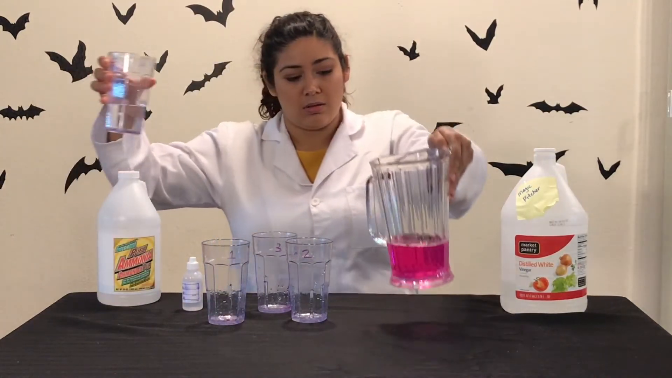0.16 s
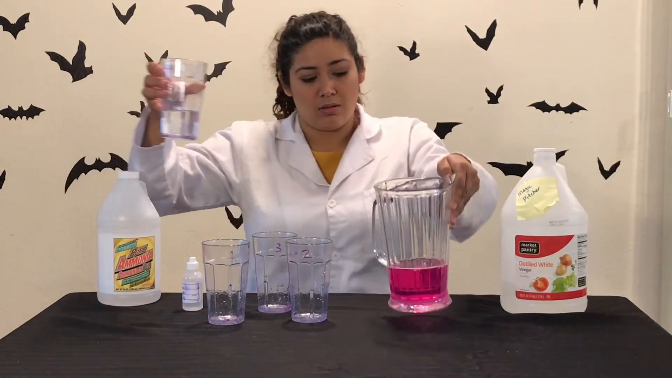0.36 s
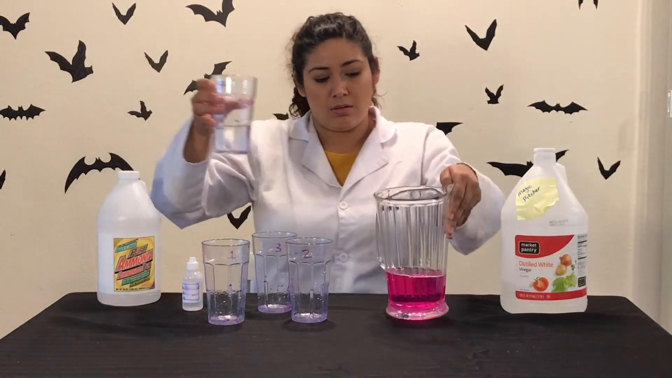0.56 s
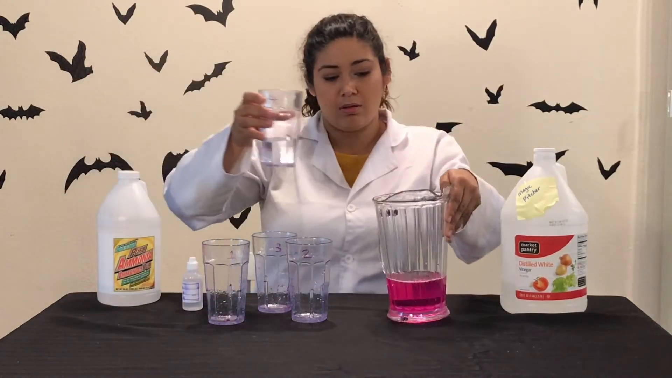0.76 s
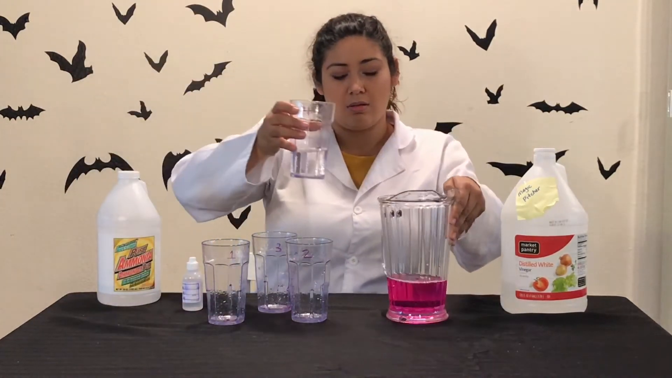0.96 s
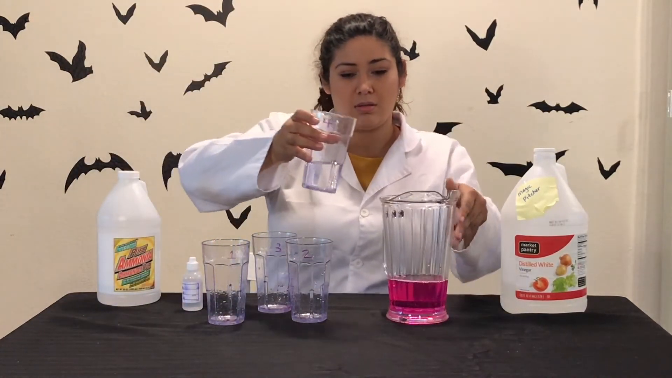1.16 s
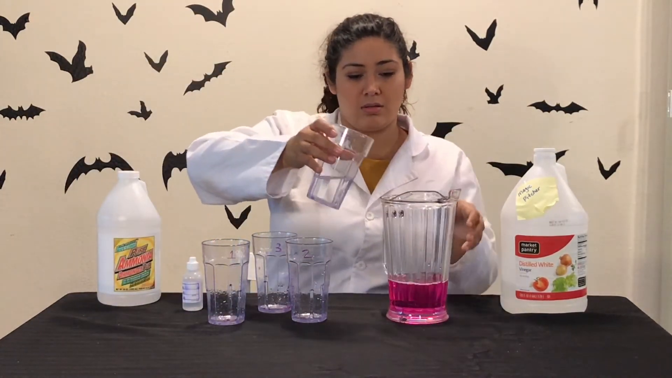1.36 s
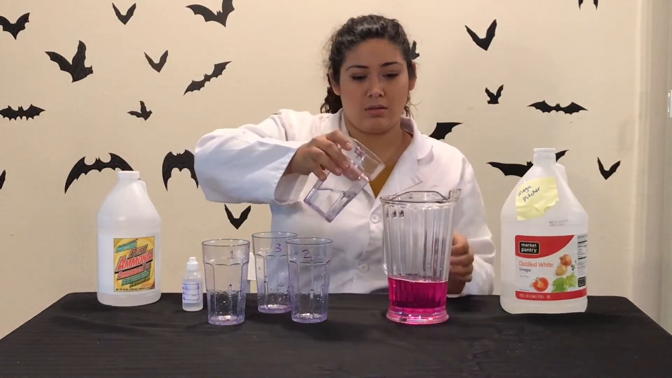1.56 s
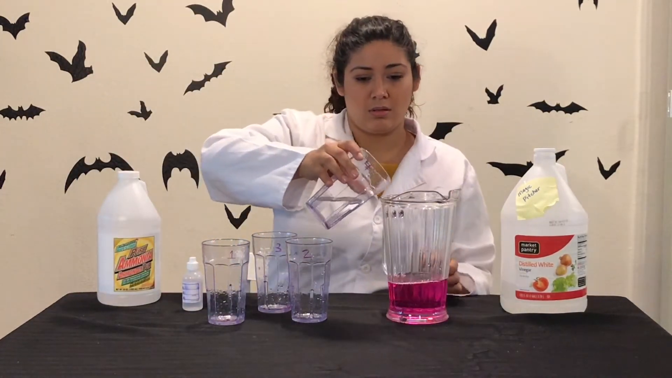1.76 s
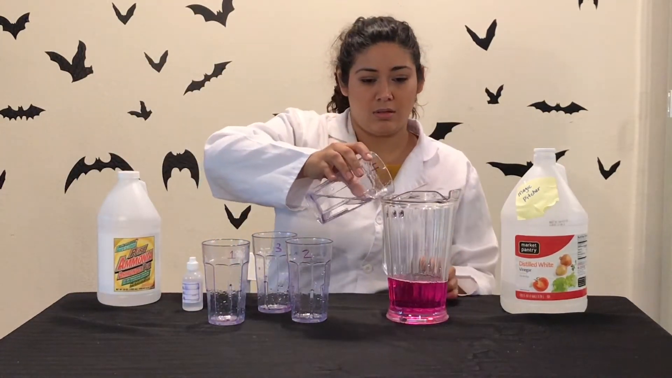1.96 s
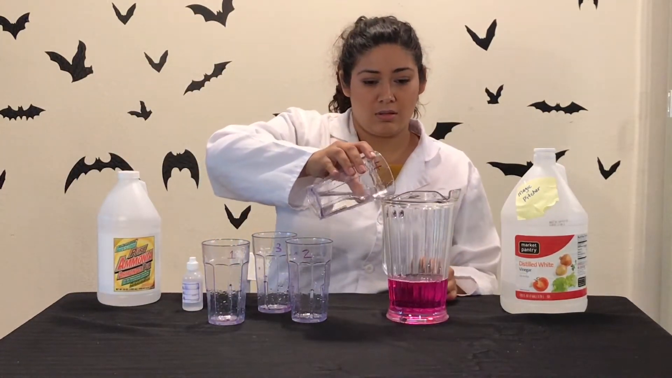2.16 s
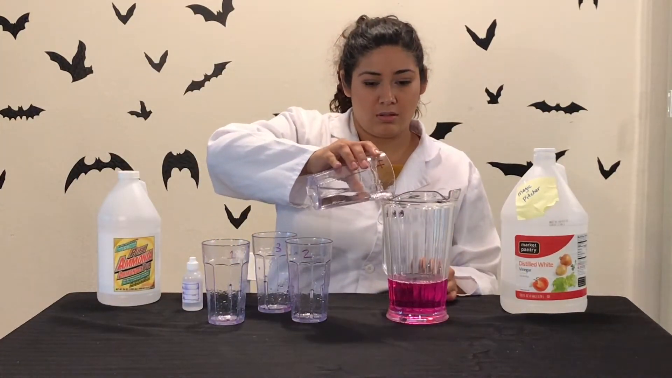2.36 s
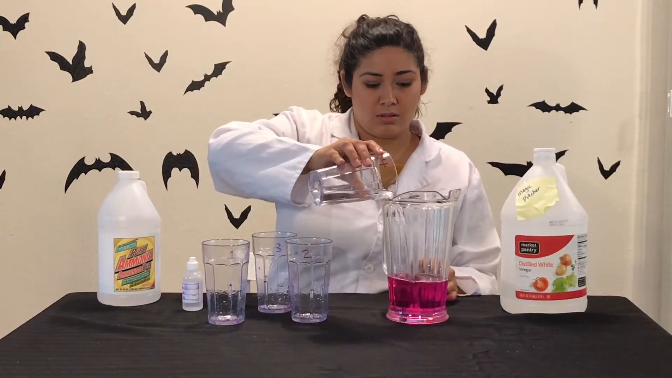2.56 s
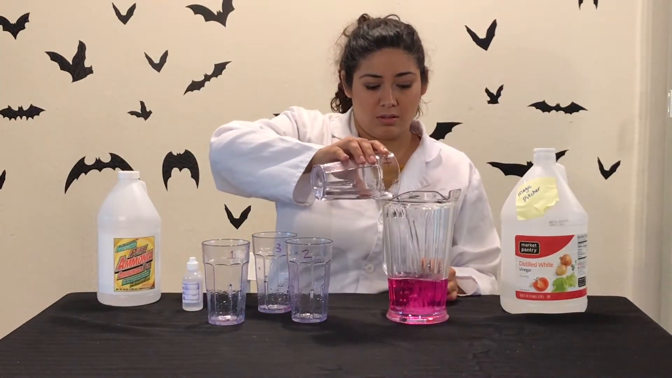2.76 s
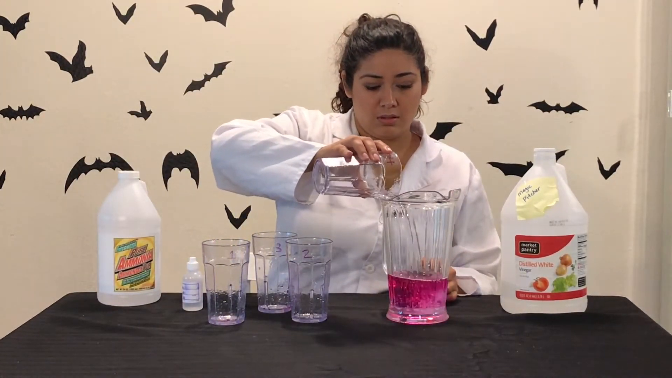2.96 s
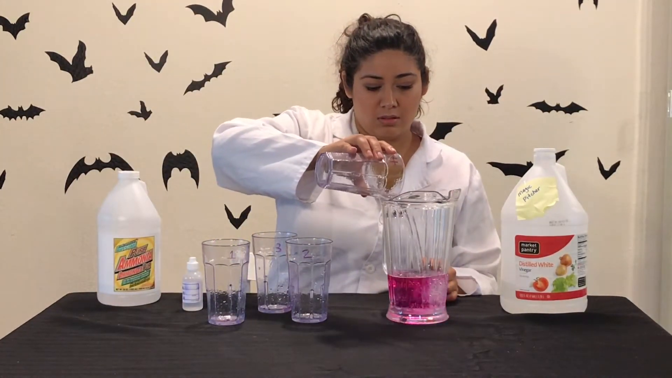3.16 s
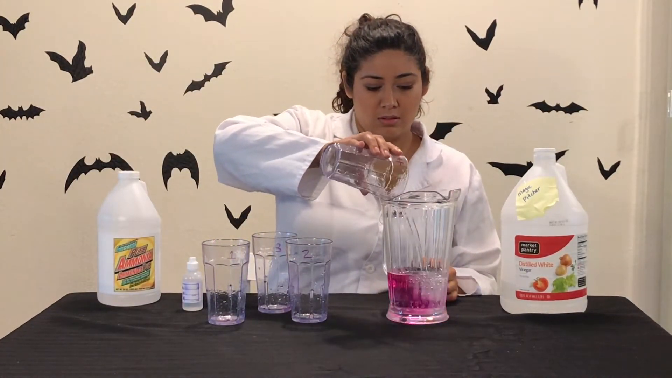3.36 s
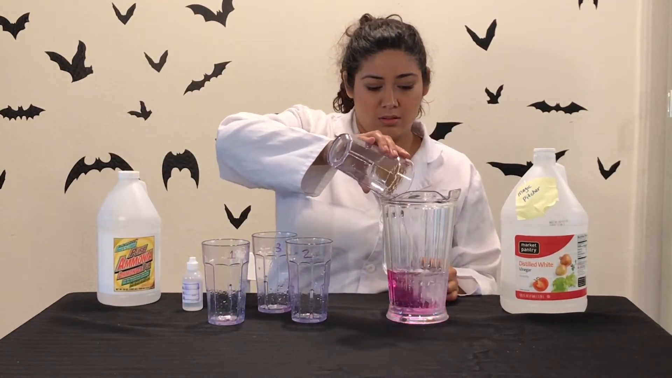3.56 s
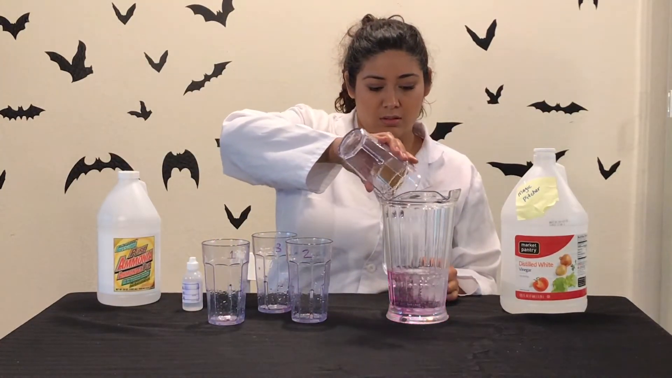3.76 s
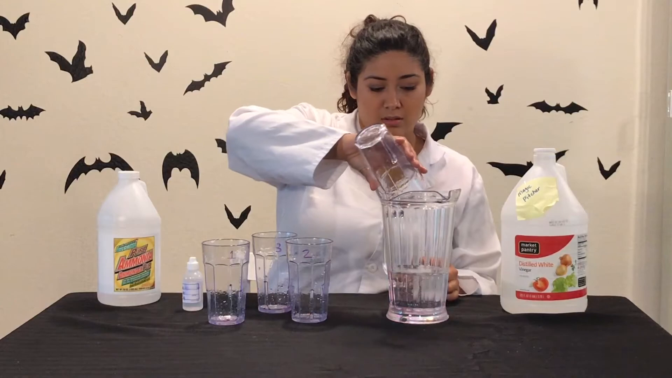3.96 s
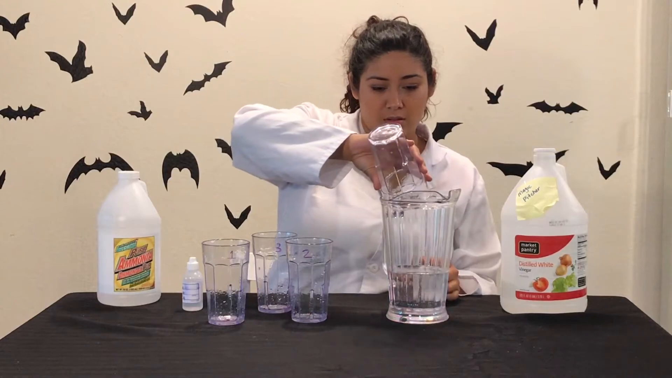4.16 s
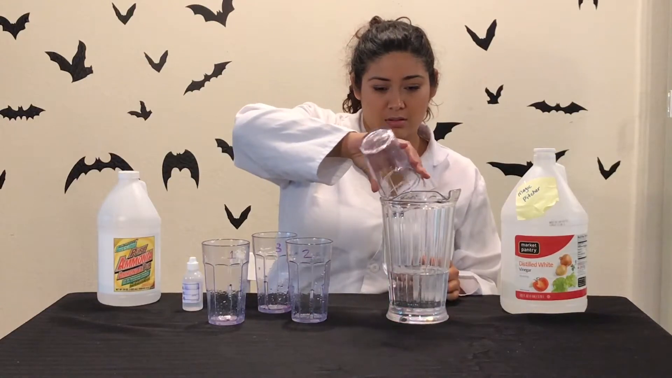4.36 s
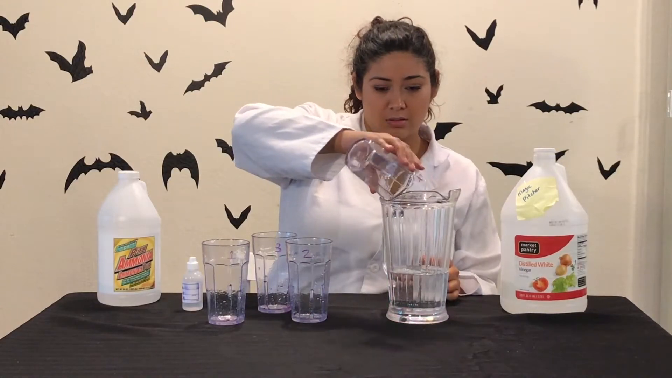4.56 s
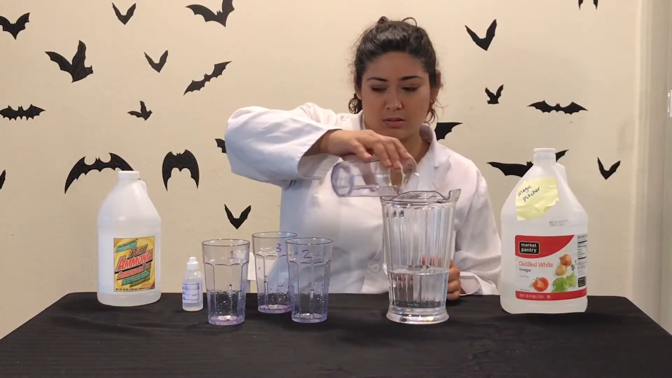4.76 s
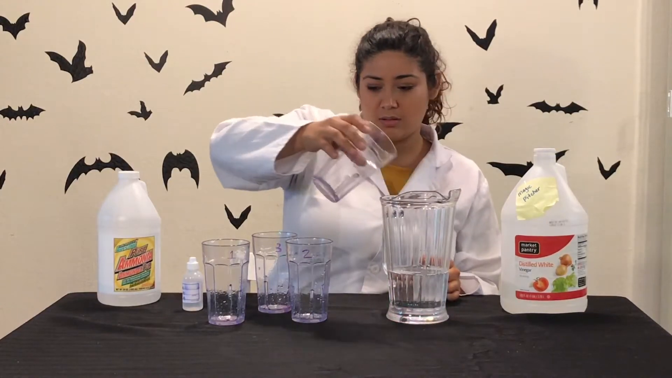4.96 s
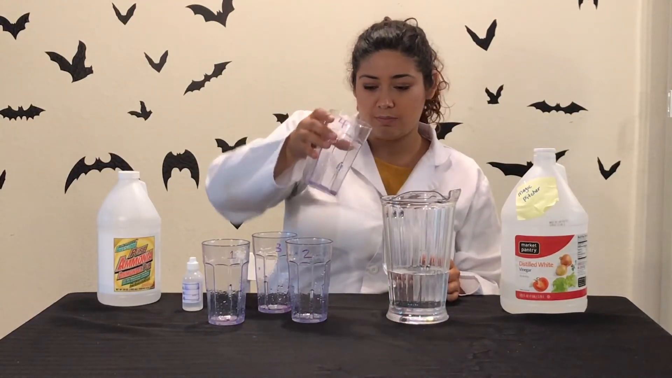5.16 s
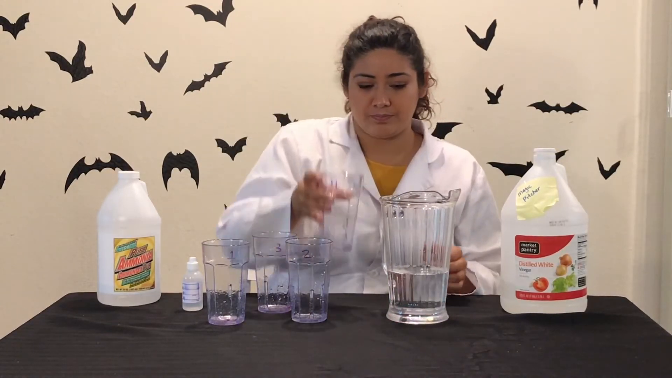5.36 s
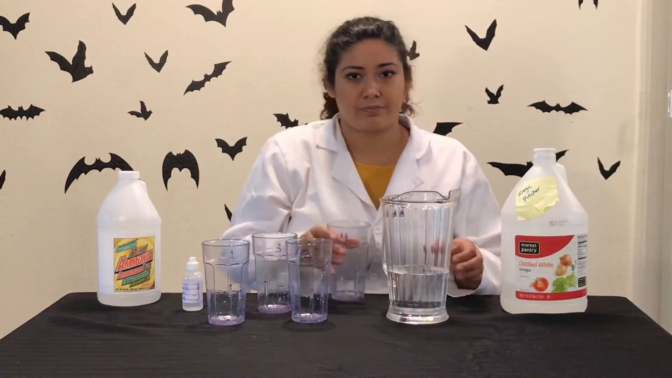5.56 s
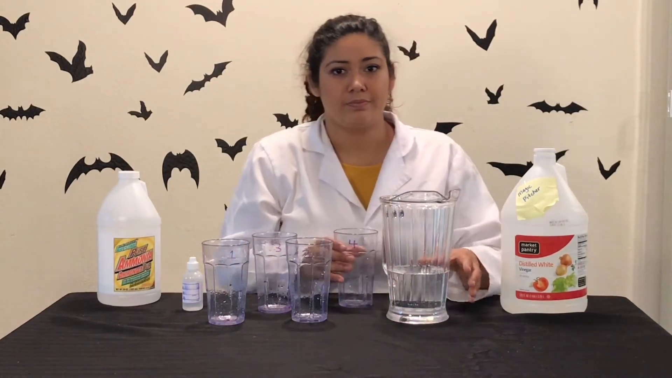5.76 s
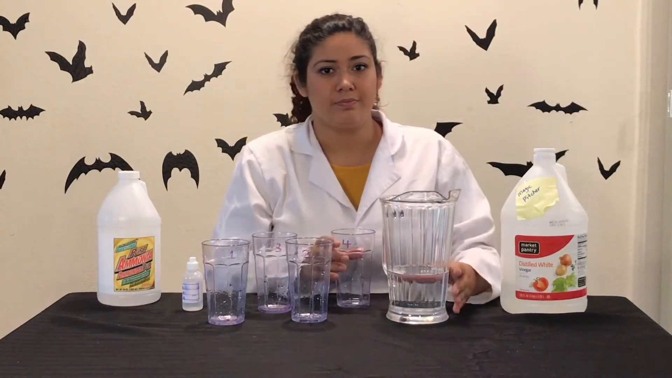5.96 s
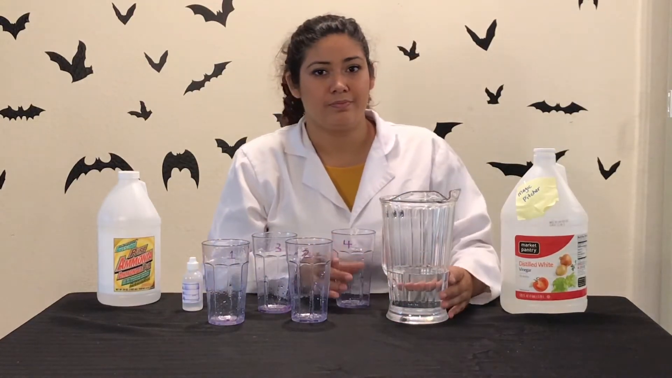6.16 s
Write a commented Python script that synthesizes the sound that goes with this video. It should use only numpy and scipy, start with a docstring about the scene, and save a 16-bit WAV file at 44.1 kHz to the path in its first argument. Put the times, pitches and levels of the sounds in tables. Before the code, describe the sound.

Dull plastic knock of a pitcher on a padded table, then near quiet with low air hum. A tiny rim tap precedes a brief pour of water, starting with a bright splash and fizz, turning to bubbly gurgling and a few plops and drips. The rim ticks again, and a plastic cup lands with a firm, hollow clunk. Small indoor room, mono pickup, the background swelling during the pour and at the end.

```python
"""Pouring water into a pitcher

A plastic pitcher is set on a cloth-covered table in a small room, water is poured in, then the plastic cup is set down.
The cup taps the rim before and after; these knocks are sets of fading tones started by clicks.
The water is swarms of short ringing bubbles, with clear bubbles, droplet splashes and a late tick on top.
A motor hums (wavering sines) over soft ventilation (shaped noise); both swell during the pour and near the end.
"""
import sys
import numpy as np
from scipy import signal
from scipy.fft import rfft, irfft
from scipy.io import wavfile

SR = 44100
rng = np.random.default_rng(int(sys.argv[2]) if len(sys.argv) > 2 else 0)


def transcribe(signal):
    """Save signal, clipped to [-1, 1], as a 16-bit WAV file at the path in sys.argv[1]."""
    frames = np.atleast_2d(signal).T
    limited = np.clip(frames, -1, 1)
    pcm = np.round(limited * 32767).astype(np.int16)
    wavfile.write(sys.argv[1], SR, pcm)


def invert_db(level):
    """Linear amplitude ratio for a level in decibels (20 dB per decade), elementwise."""
    return 10 ** (np.asarray(level, dtype=float) / 20)


N = 273861

# how the background rises and falls: start_s, level_db
BACKGROUND_SWELL = [(0, -2.5), (2.63, -2.5), (2.7, 4.5), (3.9, 5.5), (4.7, 0.2), (5.7, -2), (5.9, 3.5),
                    (6.2, 1)]
# balance of the air noise over pitch, before it is scaled as a whole: pitch_hz, level_db
AIR_SPECTRUM = [(15, -92.5), (30, -45.5), (45, -26.5), (130, -13), (190, -18), (242, -2), (300, -7),
                (353, -8.5), (383, -13), (817, -15), (1300, -18.5), (1690, -26), (1900, -32.5), (4490, -39),
                (4930, -43), (8690, -50), (10400, -46), (16000, -57)]
# duct resonances, before the swell: pitch_hz, width_hz, level_db
DUCT_RESONANCES = [(152.3, 14, -76.5), (255.2, 13, -63)]
# motor tones, before waver and swell: pitch_hz, level_db
MOTOR_TONES = [(118.4, -82), (236.8, -72.5), (296.1, -64), (355.3, -69), (710.6, -77.5), (829.0, -83.5),
               (1184, -76), (1244, -82.5)]
# blows as the pitcher, then the cup, meets the table: start_s, level_db, hardness_db_per_octave
PITCHER_LANDING = [(.7365, -21.5, 12.5), (.7405, -23.5, -2), (.7495, -25, 3.7), (.757, -38, 3),
                   (.772, -29, -0.8)]
CUP_LANDING = [(5.730, -16, 4.5), (5.736, -24.5, -3), (5.750, -33, 0.5), (5.768, -39, -5.5),
               (5.825, -51, -5.5)]
# ticks of the cup's thin wall on the rim and as it lands: start_s, level_db, hardness_db_per_octave
RIM_TICKS = [(2.051, -47.5, 6), (2.056, -66, 3.0), (2.062, -42, -12), (4.698, -47, 13),
             (4.706, -54.5, 11.0), (4.714, -69, -17), (5.731, -59.5, -0.5), (5.757, -69, 5)]
# tones (modes) of the pitcher, the cup and the rim: pitch_hz, level_db, fade_by_60_db_s
PITCHER_MODES = [(139.7, -13, 0.065), (264.4, 1.5, 0.056), (436, -10, 0.02), (680, -4.5, 0.018),
                 (843, -18, 0.077), (900.6, -15, 0.15), (1070, -1, 0.019), (1210, -2.5, 0.02),
                 (1346, -4.5, 0.031), (1634, 5, 0.0097), (1607, -3.5, 0.049), (1870, -13.5, 0.016),
                 (2130, -21, 0.027), (2474, -30, 0.014)]
CUP_MODES = [(148.5, -31.5, 0.069), (223, -15.5, 0.043), (307.6, -2.5, 0.14), (462, -7, 0.045),
             (581, -0.5, 0.11), (649.8, -11, 0.24), (680, -8, 0.19), (770, -2, 0.087), (866, -15.5, 0.1),
             (1045, -1, 0.022), (1135, -9.5, 0.065), (1212, -21, 0.19), (1364, -15.5, 0.034),
             (1567, -16.5, 0.08), (1750, -25, 0.037), (1820, -21, 0.027)]
RIM_MODES = [(510, -30, 0.038), (651, -28.5, 0.055), (795, -32, 0.09), (1360, -13.5, 0.0265),
             (1760, 3, 0.025), (1740, -7, 0.013), (2350, -23, 0.052), (3200, -3.5, 0.014),
             (3330, -4.5, .014), (3500, -3.5, 0.018), (3600, -3, 0.014), (4570, -11.5, .008),
             (5330, -25, 0.011), (5770, -28, 0.023), (8200, -38.5, 0.0068)]
# shape of the blurred tail after each sound, before it is scaled as a whole: delay_s, level_db
TAIL_SHAPE = [(0, -10), (0.01, 6), (.045, -7), (.06, -10), (.12, -28.5), (.25, -60.5)]
# strength of the poured stream: start_s, level_db
STREAM_FLOW = [(2.6, -24), (2.68, 2), (2.76, -3.5), (2.86, -3), (3.2, -5.5), (3.6, -4), (3.78, -8),
               (3.95, -6), (4.12, -15), (4.3, -44)]
# clear bubbles and late drips in the pitcher: start_s, level_db, pitch_hz
CLEAR_BUBBLES = [(2.635, -56, 4680), (2.643, -42.5, 460), (2.672, -48.5, 1730), (2.675, -37.5, 4340),
                 (2.684, -50, 3180), (2.711, -41.5, 4010), (2.75, -37, 4300), (2.772, -31.5, 5520),
                 (2.775, -33.5, 7260), (2.804, -38, 1410), (2.826, -50, 5520), (2.883, -37.5, 4680),
                 (2.885, -47, 1750), (2.945, -53.5, 7560), (2.987, -38.5, 1450), (3.009, -53, 1610),
                 (3.014, -57, 2350), (3.061, -57.5, 3480), (3.091, -44.5, 1470), (3.096, -47.5, 4390),
                 (3.122, -52, 4790), (3.167, -50.5, 5350), (3.222, -55.5, 3220), (3.225, -54, 5800),
                 (3.25, -48.5, 1760), (3.253, -55, 2680), (3.288, -57.5, 2650), (3.29, -45, 1406),
                 (3.306, -47.5, 4460), (3.324, -50, 3510), (3.333, -46.5, 5500), (3.368, -59.5, 2630),
                 (3.387, -50.5, 3510), (3.436, -46.5, 3420), (3.442, -47, 4060), (3.536, -48, 3920),
                 (3.595, -44.5, 5570), (3.6, -44, 7700), (3.623, -47, 1363), (3.638, -47, 6830),
                 (3.651, -43.5, 3020), (3.664, -43.5, 1516), (3.707, -52, 2560), (3.707, -55.5, 4030),
                 (3.707, -51, 1826), (3.719, -40.5, 613), (3.747, -31.5, 620), (3.785, -35, 1532),
                 (3.823, -40, 1090), (3.821, -41.5, 2986), (3.827, -47, 1700), (3.962, -38.5, 7110),
                 (3.966, -52.5, 5420), (4.015, -39, 1895), (4.067, -57, 1930), (4.09, -58.5, 4470),
                 (4.424, -55, 7160), (5.28, -58.5, 8480)]
# splashes of fine droplets: start_s, level_db, pitch_hz, pitch_spread_hz
DROPLET_SPLASHES = [(2.635, -59, 12000, 3970), (2.653, -50, 10550, 2000), (2.679, -48.5, 6940, 1520),
                    (2.71, -46, 7300, 1420), (2.725, -45.5, 10800, 3500), (2.748, -56, 10400, 2530),
                    (2.775, -61, 14500, 1200), (2.774, -42.5, 10800, 1970), (2.802, -53, 13000, 2096),
                    (2.889, -54.5, 12700, 3065), (2.925, -50.5, 14600, 980), (2.985, -69, 14500, 1000),
                    (3.023, -56.5, 8700, 1010), (3.024, -56, 13200, 2500), (3.147, -57.5, 6150, 1200),
                    (3.189, -70, 8200, 1500), (3.275, -52.5, 7040, 3170), (3.286, -56, 10640, 3500),
                    (3.323, -58.5, 8000, 1490), (3.328, -61.5, 14400, 905), (3.361, -57, 6430, 930),
                    (3.368, -57, 13600, 2000), (3.502, -53.5, 7100, 1590), (3.504, -50, 12700, 2000),
                    (3.522, -62, 8140, 1200), (3.53, -46.5, 12300, 946), (3.606, -69, 15000, 696),
                    (3.646, -41, 9370, 4110), (3.705, -55, 8200, 1500), (3.771, -60, 6470, 905),
                    (3.787, -61, 11900, 900), (3.822, -65, 14000, 1500), (3.843, -66, 11900, 876),
                    (3.945, -49, 8200, 920), (3.949, -52.5, 12200, 2080), (4.003, -53, 9480, 2970)]
# microphone colour in the treble: pitch_hz, level_db
MIC_COLOUR = [(7000, 2), (8800, 3.5), (10100, -6), (12000, -0.5), (13600, -5), (15000, 1.5), (16000, 2)]


def rms_one(x):
    """Scale a signal to an rms (average strength) of 1."""
    return x / np.sqrt(np.mean(x ** 2) + 1e-20)


def in_time(rows, outside=None):
    """Turn a table of times and levels into a level for every sample."""
    start_s, level_db = np.transpose(rows)
    return np.interp(np.arange(N) / SR, start_s, level_db, outside, outside)


def drift(rate_hz):
    """Slow random wandering of spread 1, made by smoothing noise twice."""
    step = 40  # work at one value per 40 samples, then fill in between
    r = np.exp(-2 * np.pi * rate_hz * step / SR)
    noise = rng.standard_normal(N // step + 2002)
    slow = signal.lfilter([1], [1, -2 * r, r * r], noise)[2000:]
    return np.interp(np.arange(N) / step, np.arange(len(slow)), rms_one(slow))


def split(x, hz):
    """Divide a sound into its parts below and above one pitch."""
    low = signal.sosfiltfilt(signal.butter(2, hz, fs=SR, output="sos"), x)
    return low, x - low


def ring(clicks, hz, t60):
    """Each unit click starts a sine of height 1 that fades by 60 dB in t60 seconds."""
    r = invert_db(-60 / (t60 * SR))
    w = 2 * np.pi * hz / SR
    return signal.lfilter([0, np.sin(w)], [1, -2 * r * np.cos(w), r * r], clicks + 1e-18)


def ventilation():
    """Air noise is random noise with a shaped spectrum; duct resonances are noise-driven ringing tones."""
    air_db = -61
    hz, db = np.transpose(AIR_SPECTRUM)
    bins = np.fft.rfftfreq(N, 1 / SR) + 1
    shape = invert_db(np.interp(np.log(bins), np.log(hz), db))
    out = invert_db(air_db) * rms_one(irfft(rfft(rng.standard_normal(N)) * shape, N))
    for centre_hz, width_hz, level_db in DUCT_RESONANCES:
        # a narrower resonance rings longer
        out += invert_db(level_db) * rms_one(ring(rng.standard_normal(N), centre_hz, 2.4 / width_hz))
    return out


def motor():
    """Steady sine tones whose phase and loudness wander slowly."""
    out = np.zeros(N)
    for line_hz, level_db in MOTOR_TONES:
        turns = line_hz * np.arange(N) / SR + rng.random() + 0.065 * drift(3.7)
        waver_db = (2.0 + 4.1 * line_hz / 1000) * np.minimum(drift(3.2), 1)  # upper tones flicker more
        out += np.sqrt(2) * invert_db(level_db + waver_db) * np.sin(2 * np.pi * turns)
    return out


def background():
    """Ventilation and motor rise and fall together."""
    return invert_db(in_time(BACKGROUND_SWELL)) * (ventilation() + motor())


def knock(blows, modes, band_hz):
    """Blows set every mode ringing; harder ones favour high modes, and neighbours swing opposite ways."""
    uneven_db = 1.5        # each blow strikes each mode a little differently
    contact_cycles = 2.1   # a mode builds up over this many of its cycles
    start_s, blow_db, hardness = np.transpose(blows)
    at = np.round(start_s * SR).astype(int)
    out = np.zeros(N)
    for k, (hz, mode_db, t60) in enumerate(modes):
        tilt_db = hardness * np.log2(hz / 2000)
        chance_db = uneven_db * rng.standard_normal(len(at))
        clicks = np.zeros(N)
        clicks[at] = (-1) ** k * invert_db(blow_db + mode_db + tilt_db + chance_db)
        # taking away a shorter ringing leaves a gentle start
        out += ring(clicks, hz, t60) - ring(clicks, hz, min(contact_cycles / hz, t60 / 2))
    return signal.sosfilt(signal.butter(8, band_hz, "band", fs=SR, output="sos"), out)


def pitcher_set_down():
    """The pitcher's size and the soft cloth limit its knocks to a low band."""
    return knock(PITCHER_LANDING, PITCHER_MODES, band_hz=(54, 2550))


def blurred_tail(x):
    """A noisy tail follows each sound, holds for about 45 ms, then drops, the treble first."""
    tail_db, bass_cut_hz = -3, 292  # the tail holds little bass
    treble_hz, treble_loss_db_per_s = 3750, 399.5
    delay, db = np.transpose(TAIL_SHAPE)
    t = np.arange(int(delay[-1] * SR)) / SR
    low, high = split(rng.standard_normal(len(t)), treble_hz)
    tail = invert_db(np.interp(t, delay, db)) * (low + high * invert_db(-treble_loss_db_per_s * t))
    x = signal.sosfilt(signal.butter(1, bass_cut_hz, "high", fs=SR, output="sos"), x)
    return invert_db(tail_db) * signal.fftconvolve(x, tail / np.linalg.norm(tail))[:N]


def rim_taps():
    """The cup's thin wall ticks on the pitcher's rim and as it lands, ringing high and short."""
    return knock(RIM_TICKS, RIM_MODES, band_hz=(350, 12000))


def swarm(low_hz, high_hz, per_s, cycles, uneven_db, clump_db):
    """Small bubbles ring at random moments and pitches, in clumps, scaled to rms 1."""
    pitches = 18
    size_db = uneven_db * np.minimum(rng.exponential(1, N), 4)
    sizes = invert_db(size_db) * rng.choice([-1, 1], N)
    born = rng.random(N) < per_s * invert_db(clump_db * drift(15)) / SR
    dealt = rng.integers(0, pitches, N)  # which pitch each bubble gets
    out = np.zeros(N)
    for k, hz in enumerate(np.geomspace(low_hz, high_hz, pitches)):
        clicks = sizes * born * (dealt == k)
        t60 = cycles / hz
        # ringing twice softens each start; hz makes up for the shorter ringing of high pitches
        out += hz * ring(ring(clicks, hz, t60), hz, t60)
    return rms_one(out)


def stream():
    """Gurgle in the pitcher, with fizz and fine spray at the surface, all follow the flow."""
    flow_db = in_time(STREAM_FLOW, outside=-56.5)
    since_s = np.arange(N) / SR - STREAM_FLOW[0][0]
    gurgle = swarm(505.3, 2610, 990.0, cycles=28.0, uneven_db=7.0, clump_db=4.0)
    fizz = swarm(2200, 6800, 2600.0, cycles=33.0, uneven_db=4.5, clump_db=11.0)
    spray = swarm(5000, 15000, 2100.0, cycles=69.0, uneven_db=3.5, clump_db=7.0)
    # as the pitcher fills, gurgle gains 3.5 dB per second and spray loses 14
    gurgle_db = -64 + 3.5 * since_s
    fizz_db = -66
    spray_db = -72 - 14 * since_s
    return (invert_db(flow_db + gurgle_db) * gurgle + invert_db(flow_db + fizz_db) * fizz
            + invert_db(flow_db + spray_db) * spray)


def burst(hz, length, spread_hz, chance, rise, stagger):
    """Neighbouring bubbles around one pitch start a little apart, each rising in pitch as it rings."""
    late = stagger * length * np.abs(chance[:, 2:]) * min(spread_hz / hz * 10, 1)
    t = np.maximum(np.arange(int(5 * length * SR)) / SR - late, 0)
    shape = (t / length * 3.8) * np.exp(1 - t / length * 4.65)
    places = np.linspace(-1.6, 1.6, len(chance))[:, None] + 0.23 * chance[:, :1]
    pitches = np.clip(hz + spread_hz * places, 100, 15800)
    phase = 2 * np.pi * (pitches * (t + rise * t ** 2 / length) + chance[:, 1:2])
    weight = np.exp(-places ** 2)  # strongest at the middle pitch
    return (shape * weight * np.sin(phase)).sum(axis=0) / np.sqrt(len(chance) / 3)


def snap(hz):
    """The film breaks: a brief click, broad around the pitch."""
    snap_db, cycles = -6, 1.3  # cycles until the click is strongest
    turns = np.arange(int(8 * cycles * SR / hz)) * hz / SR
    shape = turns / cycles * np.exp(1 - turns / cycles)
    return invert_db(snap_db) * shape * np.sin(2 * np.pi * turns)


def bubbles():
    """Clear bubbles, splashes and a tick are bursts with a snap, louder for wider bursts up to a limit."""
    # each row: start_s, level_db, pitch_hz, length_s, pitch_spread_hz, bubble count, snap_db, stagger
    rows = []
    for s, db, hz in CLEAR_BUBBLES:
        length = 0.014 * (hz / 1000) ** -0.471  # small bubbles ring higher and shorter
        rows.append((s, db, hz, length, 0.085 * hz, 17, 0, 0.3))
    for s, db, hz, spread_hz in DROPLET_SPLASHES:
        rows.append((s, db, hz, 0.0095, spread_hz, 60, -10, 0.8))
    # a dry, broad tick: a last drip
    rows.append((5.271, -60, 5500, 0.0025, 2600, 60, 0, 0.3))
    out = np.zeros(N + SR)
    chance = rng.standard_normal((len(rows), 60, 3))
    for (s, db, hz, length, spread_hz, many, snap_db, stagger), draw in zip(rows, chance):
        at = round(s * SR)
        tone = invert_db(db) * burst(hz, length, spread_hz, draw[:many], rise=0.016, stagger=stagger)
        click = invert_db(db + snap_db) * snap(hz) * min(spread_hz / hz * 10, 1)
        out[at:at + len(tone)] += tone
        out[at:at + len(click)] += click
    return out[:N]


def cup_set_down():
    """The cup's size and the soft cloth limit its knocks to their own band."""
    return knock(CUP_LANDING, CUP_MODES, band_hz=(120, 2090))


def scene():
    """Water and knocks, each with a blurred tail, over the background."""
    knocks = pitcher_set_down() + cup_set_down()
    near = rim_taps() + stream() + bubbles()
    # the tail of the table knocks is 1.5 dB weaker than that of the water and rim taps
    tail = blurred_tail(near + invert_db(-1.5) * knocks)
    return (near + knocks + tail + background())[None]


def low_pass(x):
    """Removes everything above the highest recorded frequency."""
    return signal.sosfilt(signal.butter(12, 16120, fs=SR, output="sos"), x)


def record(dry):
    """A single microphone drops the deepest bass and colours the treble."""
    heard = signal.sosfilt(signal.butter(4, 46.4, "high", fs=SR, output="sos"), dry)
    hz, db = np.transpose(MIC_COLOUR)
    colour = invert_db(np.interp(np.fft.rfftfreq(N, 1 / SR), hz, db))
    heard = irfft(rfft(heard) * colour, N)
    return low_pass(heard)


dry = scene()
out = record(dry)
transcribe(out)
```